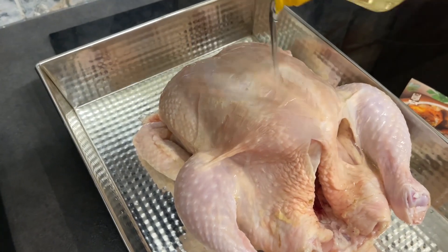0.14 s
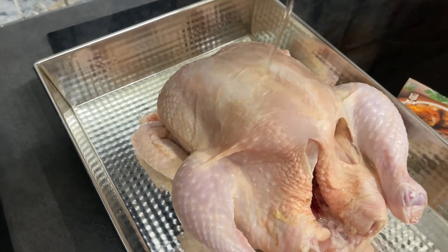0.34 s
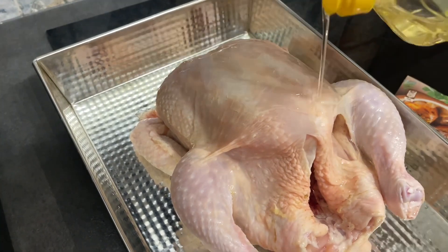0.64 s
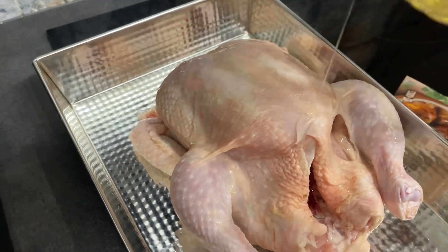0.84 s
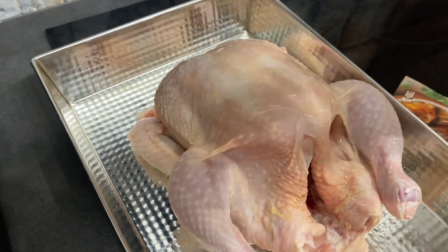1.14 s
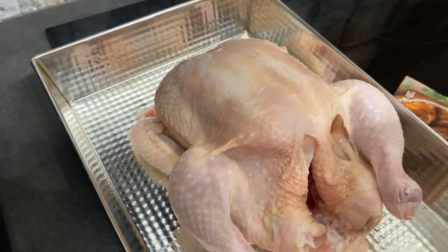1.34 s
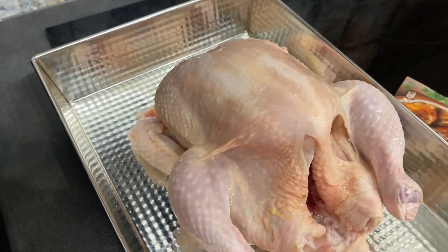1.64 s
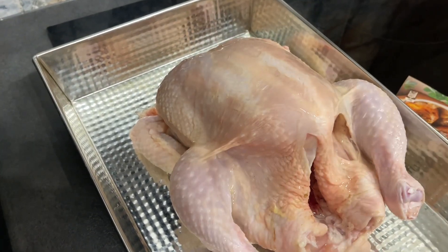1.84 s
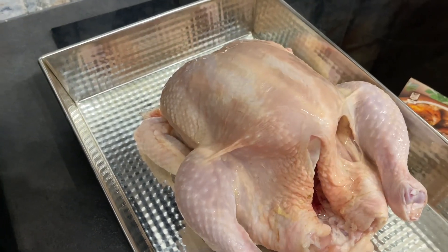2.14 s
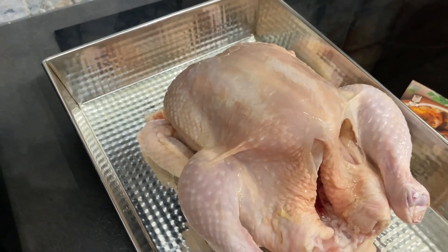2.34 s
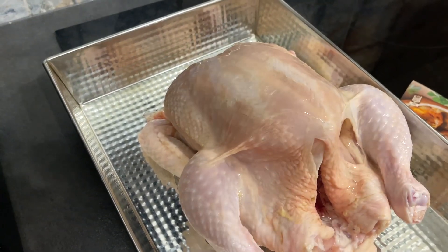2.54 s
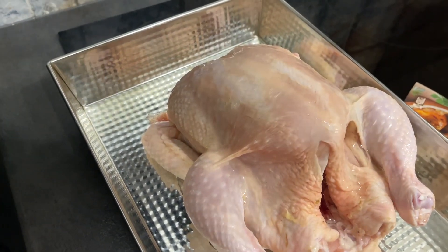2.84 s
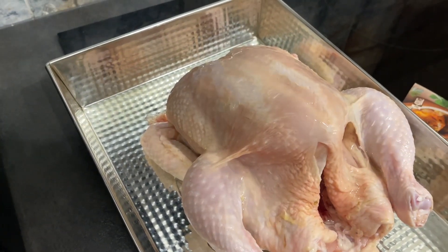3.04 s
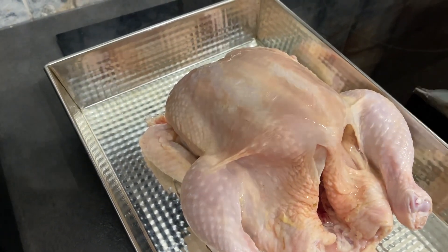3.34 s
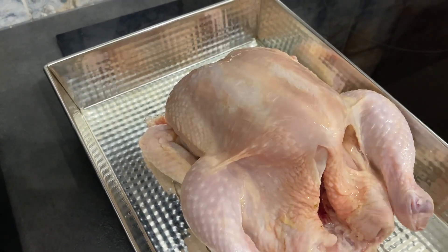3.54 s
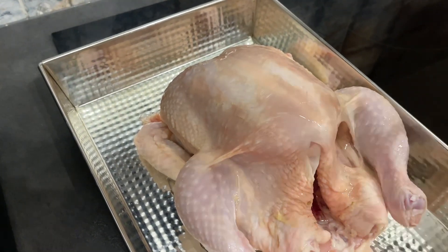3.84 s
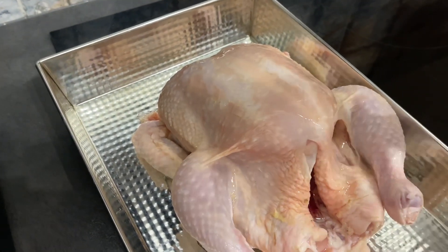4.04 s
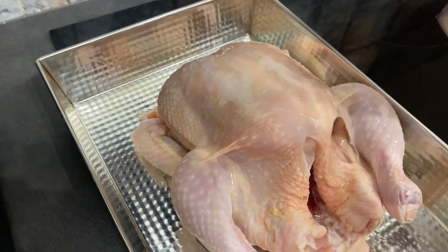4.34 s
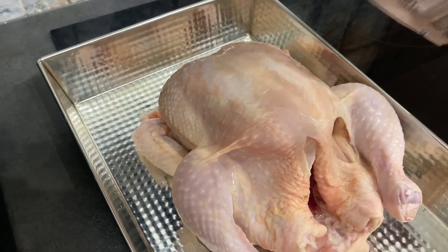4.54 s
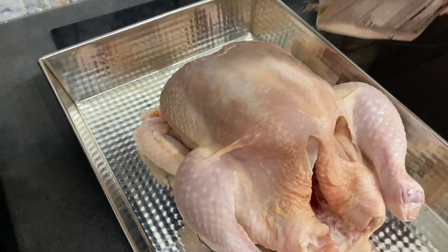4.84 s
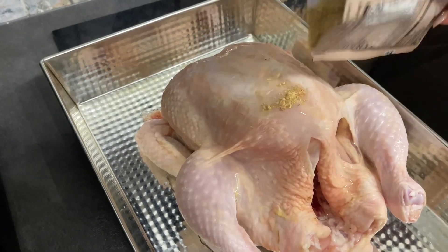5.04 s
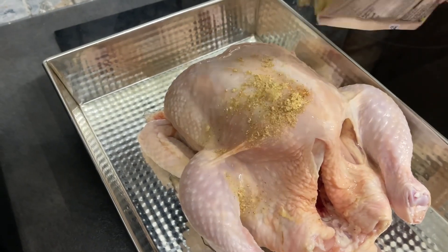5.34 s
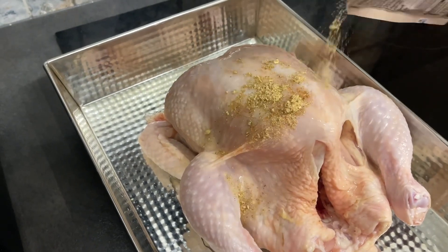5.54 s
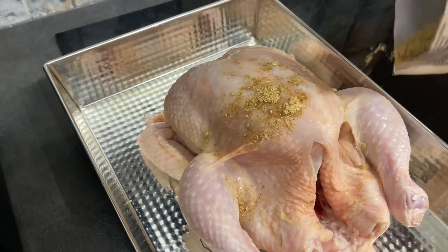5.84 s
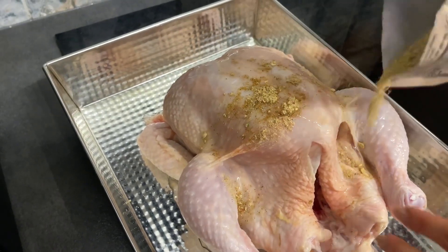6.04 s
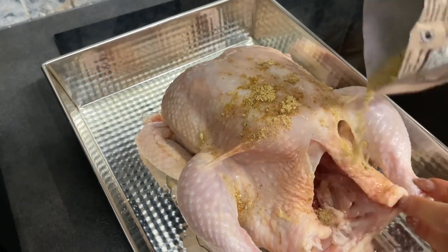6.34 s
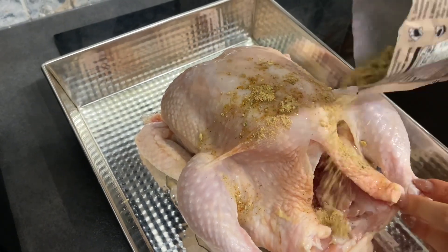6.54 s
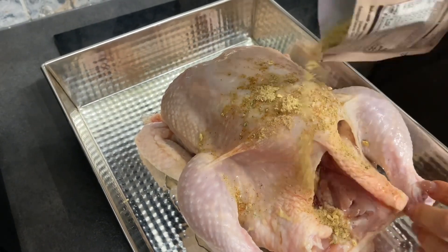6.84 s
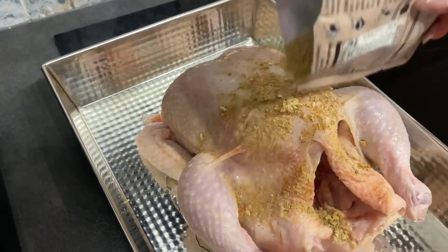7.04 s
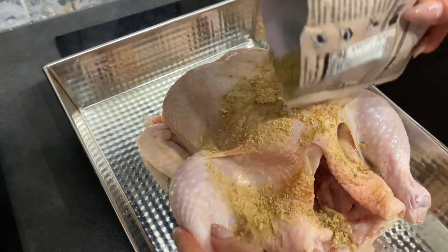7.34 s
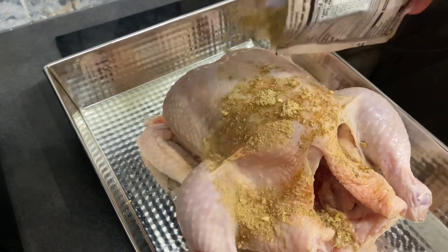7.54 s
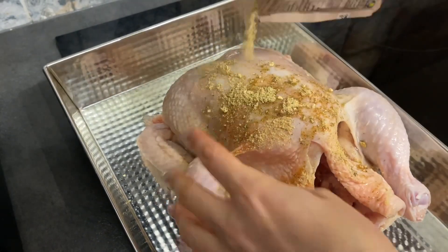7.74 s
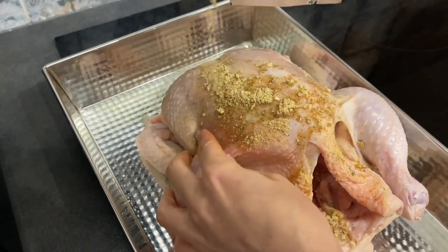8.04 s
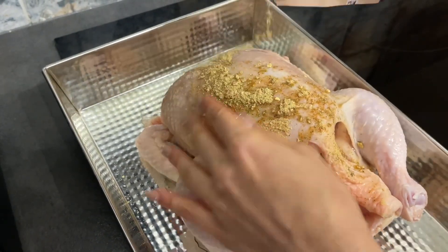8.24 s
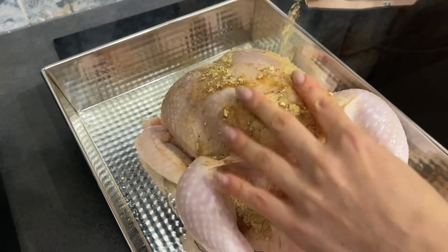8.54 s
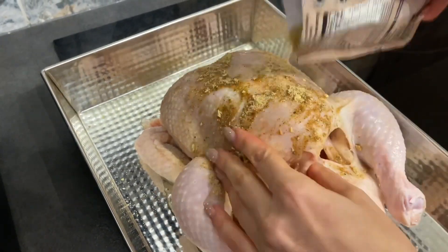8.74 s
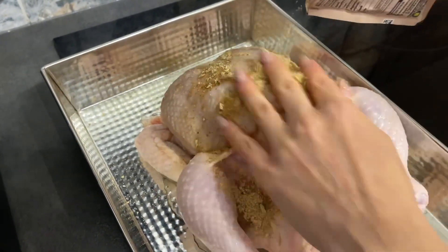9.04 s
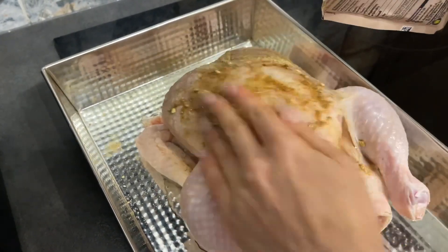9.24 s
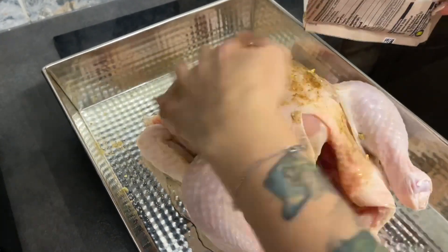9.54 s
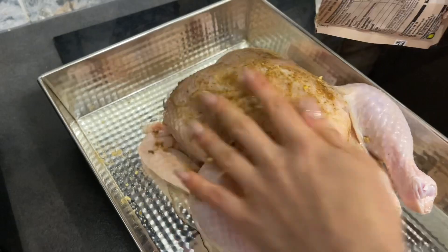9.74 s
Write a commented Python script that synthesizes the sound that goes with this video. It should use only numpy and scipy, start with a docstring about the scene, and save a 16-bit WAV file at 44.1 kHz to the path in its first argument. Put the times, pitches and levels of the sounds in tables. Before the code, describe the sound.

A phone close to a kitchen counter picks up scattered taps, low thumps and a short heavy scrape, then the loud dry tearing of a paper seasoning packet. Softer rustles and sharp creases follow as it is shaken out in short bursts, with a single bright clack among them. It ends in swishing, grainy rubbing of powder over oiled skin, with a short room tail and faint low rumble.

```python
"""First come light touches, knocks and pushes, as things are put down and moved on a kitchen counter; then a
paper seasoning packet is pulled open and shaken out over a chicken in a metal tray, and a hand rubs the powder in.
Creases are noise bursts ringing paper resonances; crackle and powder are noise gated by random grains.
Knocks are noise bursts ringing modes, bumps are falling sines, and drags are stick-slip noise in resonators.
A small room answers with a short tail over a low rumble, and a phone takes it in at two ports."""
import sys
import numpy as np
from scipy import signal
from scipy.fft import rfft, irfft, next_fast_len
from scipy.io import wavfile
from scipy.ndimage import uniform_filter1d

SR = 44100
rng = np.random.default_rng(int(sys.argv[2]) if len(sys.argv) > 2 else 0)


def unload_wav(signal):
    """Save mono or channel-first audio to the path in sys.argv[1] as 16-bit WAV at rate SR, clipped to [-1, 1]."""
    wavfile.write(
        sys.argv[1],
        SR,
        np.round(np.clip(np.atleast_2d(signal).T, -1, 1) * 32767).astype(np.int16),
    )


N = 436590
TIME = np.arange(N) / SR
HIT_TIME = np.arange(-SR // 50, SR // 3) / SR  # a hit's own clock: its peak is at 0

# the top of the packet is torn off in two pulls: (time [s], level [dB])
TEAR = [(3.76, -60), (3.779, -33), (3.94, -35.5), (4.1, -44), (4.16, -38.5), (4.285, -33), (4.34, -48)]
# shakes that tip the powder out: (start [s], length [s], level [dB])
SHAKES = [(5.453, 0.053, -52.5), (5.59, 0.038, -52), (5.838, 0.054, -55.5), (5.979, 0.09, -50.5),
          (6.273, 0.066, -44.5), (6.409, 0.081, -43.5), (6.571, 0.025, -44.5), (6.689, 0.087, -49),
          (6.864, 0.01, -48), (7.009, 0.068, -56.5), (7.175, 0.071, -38), (7.317, 0.071, -42),
          (7.461, 0.17, -49), (8.296, 0.21, -46.5), (8.562, 0.064, -43), (8.65, 0.13, -51.5),
          (8.847, 0.087, -43)]
# spectrum of fine paper crackle: (frequency [Hz], level [dB])
CRACKLE = [(1500, -19), (3000, -11.5), (6500, -9), (8500, -1.5), (11300, 2), (12400, -14.5), (13800, -55)]
# spectrum of the duller sound of the paper sheet: (frequency [Hz], level [dB])
PANEL = [(100, -1.5), (250, 4), (480, -5.5), (900, 1), (1900, 2.5), (2800, -0.5), (14000, -38.5)]
# spectrum of dull blows and judder: (frequency [Hz], level [dB])
THUD = [(60, -13), (130, 2), (430, -13.5), (750, -17), (2500, -31.5), (14000, -75)]


def undb(db):
    """Amplitude ratio of a level: 20 dB is a factor of ten."""
    return 10 ** (np.asarray(db) / 20)


def unit(x):
    """Normalisation to an rms amplitude of 1."""
    return x / np.sqrt(np.mean(x ** 2))


def noise(size):
    """Partial coherence: noise at two microphones is partly shared and partly of opposite sign."""
    mid, side = rng.standard_normal((2, size))
    return mid + .62 * np.array([side, -side])


def colour(x, points):
    """Minimum-phase filtering: the folded cepstrum of a (Hz, dB) log gain gives a causal response."""
    size = 2048
    hz, db = np.transpose(points)
    grid = np.maximum(np.fft.rfftfreq(size, 1 / SR), 1)
    log_gain = np.log(undb(np.interp(np.log(grid), np.log(hz), db)))
    cepstrum = irfft(log_gain)
    cepstrum[1:size // 2] *= 2
    cepstrum[size // 2 + 1:] = 0
    response = irfft(np.exp(rfft(cepstrum)))
    return signal.oaconvolve(x, response[None], axes=1)[:, :x.shape[1]]


def resonate(x, hz, q):
    """Simple resonance: gain 1 at its centre, falling away on both sides."""
    centre = np.clip(hz, 30, SR / 3)
    return signal.lfilter(*signal.iirpeak(centre, max(q, .5), fs=SR), x)


def ring(x, hz, t60):
    """Modal decay: the Q follows from the time t60 [s] in which the mode falls by 60 dB."""
    return resonate(x, hz, np.pi * hz * t60 / np.log(1000))


def fade(t60, rise=0.019):
    """Exponential growth and decay of a hit: up by 60 dB in rise [s], down by 60 dB in t60 [s]."""
    growth, decay = -HIT_TIME / max(rise, 1e-4), HIT_TIME / max(t60, 1e-3)
    return np.exp(-np.log(1000) * np.maximum(decay, growth))


def burst(t60, rise, tail_db, tail_t60):
    """Impact as uneven micro-clicks: fast decay, weaker aftermath, and a ragged colour for each spot struck."""
    size = len(HIT_TIME)
    clicks = noise(size) * undb(2.5 * rng.standard_normal(size))
    spot = .11 * rng.standard_normal(160) * np.exp(-np.arange(160) / 60)
    spot[0] = 1
    clicks = signal.oaconvolve(clicks, spot[None], axes=1)[:, :size]
    return clicks * (fade(t60, rise) + undb(tail_db) * fade(tail_t60, 2 * rise))


def strength(x, db):
    """Short-time level: scale a hit so that its loudest 5 ms have this rms level."""
    power = uniform_filter1d(x.mean(axis=0) ** 2, SR // 200)
    return x * undb(db) / np.sqrt(power.max())


def place(hit, s):
    """Directional hearing by arrival time and level; the time difference vanishes at high frequencies."""
    # where the hands work, from each time on: (time [s], left delay [ms], left minus right [dB])
    hand_places = [(0, -0.047, -0.9), (2.7, -0.049, 1), (3.7, 0.18, 0), (4.5, -0.033, -2)]
    _, lag_ms, pan_db = [row for row in hand_places if row[0] <= max(s, hand_places[0][0])][-1]
    size = next_fast_len(hit.shape[1])
    hz = np.fft.rfftfreq(size, 1 / SR)
    turn = np.pi * hz * lag_ms / 1000 / (1 + (hz / 7500) ** 12)  # half the delay goes to each side
    sides = np.array([[1], [-1]])
    return irfft(rfft(hit, size) * np.exp(-1j * sides * turn), size) * undb(sides * pan_db / 2)


def add(track, s, hit):
    """Superposition: add a hit to a stereo track, with its peak near s seconds."""
    start = max(int((s + HIT_TIME[0]) * SR), 0)
    track[:, start:start + hit.shape[1]] += hit[:, :N - start]


def walk(rate):
    """Slow random fluctuation of rms 1: random levels, rate per second, joined by straight lines."""
    return unit(np.interp(TIME * rate, np.arange(400), rng.standard_normal(400)))


def grains(rate, spread_db, t60):
    """Random point process: tiny slips of uneven size, each a puff of energy; returns an envelope of rms 1."""
    chance, size = rng.random(N), np.minimum(rng.exponential(size=N), 4)
    slips = (chance < rate / SR) * undb(spread_db * size) ** 2
    power = signal.fftconvolve(slips, fade(t60, rise=.005) ** 2)[:N]
    return np.sqrt(np.maximum(power, 0) / power.mean())


def move(start, length, attack_s=0.012, release_s=0.015):
    """Exponential build-up and release of one move of the hand, with a hold between (time constants)."""
    before = np.maximum(start - TIME, 0)
    after = np.maximum(TIME - start - length, 0)
    return np.exp(-before / attack_s - after / release_s) + 1e-9


def follow(curve, axis=1):
    """Level interpolation: gain along one dB column of a curve, silent before and after it."""
    columns = np.transpose(curve)
    return undb(np.interp(TIME, columns[0], columns[axis], left=-180, right=-180))


def flexing(taut_panel_db=1.5, slack_panel_db=-9):
    """Tension and radiation: taut paper carries more dull sound than slack; gains of crackle and panel."""
    # the mouth of the packet is spread open: (time [s], level [dB])
    spread_open = [(4.385, -36), (4.55, -43), (4.648, -29.5), (4.764, -43), (4.94, -42), (5.0, -52)]
    # held over the tray, the packet is never quite still: (time [s], level [dB])
    held_packet = [(5.0, -51.5), (5.75, -68), (6.5, -55), (7.5, -48), (8.1, -56.5), (8.9, -56.5)]
    taut = follow(TEAR)
    shaken = sum(undb(db) * move(s, length) for s, length, db in SHAKES)
    slack = follow(spread_open) + follow(held_packet) + shaken
    return taut + slack, taut * undb(taut_panel_db) + slack * undb(slack_panel_db)


def snaps(crack_db=-1, panel_db=-1, ring_db=6, panel_q=7, facet_db=6, facet_t60=0.023, count=4):
    """Buckling: a crease flips with a crack and rings the paper beside it and a few small stiff facets."""
    # the louder creases, before the overall trims: (time [s], crack [dB], panel [dB], panel pitch [Hz])
    creases = [(1.945, -32.5, -64, 1590), (3.1889, -43, -30.5, 2400), (3.226, -30.5, -40, 2370),
               (3.2484, -56, -30.5, 1020), (3.3466, -41, -29.5, 1140), (3.7787, -16.5, -21, 1230),
               (3.8236, -10, -11.5, 1180), (3.865, -9, -24.5, 1340), (3.9209, -18, -20.5, 1850),
               (3.927, -5.5, -17.5, 1440), (3.9374, -15, -18.5, 1864), (4.052, -25.5, -32, 2000),
               (4.139, -14.5, -23, 1960), (4.1537, -24, -16.5, 1900), (4.185, -11.5, -21, 1030),
               (4.2336, -15, -25, 1080), (4.24, -9.5, -17, 1530), (4.353, -27.5, -52, 1080),
               (4.367, -24.5, -46, 1500), (4.4409, -32, -28.5, 1800), (4.595, -31, -29, 1294),
               (4.669, -23, -43, 2400), (5.0424, -39, -25.5, 1780), (5.0651, -31, -19.5, 2300),
               (5.088, -15, -23.5, 2340), (5.138, -30.5, -26, 2150), (5.36, -33.5, -43.5, 2240),
               (5.5, -30.5, -46, 1880), (5.6367, -36, -43, 2500), (5.7416, -37.5, -46, 1620),
               (6.053, -29, -46, 2350), (6.256, -34, -37.5, 1070), (6.276, -30, -41, 1300),
               (6.308, -41, -43, 2050), (6.4247, -23.5, -30, 1380), (6.5621, -40, -34.5, 1450),
               (6.701, -32, -40.5, 1162), (6.774, -27.5, -45, 2330), (6.911, -31.5, -50, 2110),
               (7.33, -28.5, -35.5, 1703), (7.45, -19, -34.5, 2320), (7.583, -26.5, -45, 1880),
               (7.8508, -33, -43, 2260), (8.226, -29.5, -45, 960), (8.355, -18, -41, 2130),
               (8.4195, -36, -31, 1770), (8.452, -29.5, -42, 2100), (8.58, -52, -36, 1710),
               (8.841, -24.5, -36.5, 1230), (9.1478, -20, -39, 2320)]
    # spectrum of the crack: (frequency [Hz], level [dB])
    crack_colour = [(1500, -29), (4000, -1.5), (6500, -1), (11000, 13.5), (12500, -5.5), (14000, -42)]
    out = np.zeros((2, N))
    for s, high, low, hz in creases:
        crack = colour(burst(t60=.018, rise=.0015, tail_db=-18, tail_t60=.08), crack_colour)
        facets = sum(ring(crack, f, facet_t60) for f in 2800 * 3.3 ** rng.random(count))
        crack = crack + undb(facet_db) * facets
        panel = colour(burst(t60=.026, rise=.005, tail_db=-17, tail_t60=.1), PANEL)
        panel = panel + undb(ring_db) * resonate(panel, hz, panel_q)
        hit = strength(crack, high + crack_db) + strength(panel, low + panel_db)
        add(out, s, place(hit, s))
    return out


def crinkles(flex, count=290, crack_db=-2, panel_db=-1, spread_db=7):
    """Scattered buckling: small creases give way as the paper flexes, each with its own pitches."""
    out, size = np.zeros((2, N)), len(HIT_TIME) // 8
    high, low = 20 * np.log10(flex)
    first, last = TEAR[0][0], SHAKES[-1][0]
    fine, dull = colour(noise(N), CRACKLE), colour(noise(N), PANEL)
    envelope = fade(t60=.021, rise=.001)[:size]
    for when, pitch, tone, force, weight in rng.random((count, 5)):
        t = first + when * (last - first)
        i = int(t * SR)
        crack = resonate(fine[:, i:i + size] * envelope, 4000 * 2.7 ** pitch, 1.5)
        panel = resonate(dull[:, i:i + size] * envelope, 850 * 3 ** tone, 5)
        crack = strength(crack, high[i] + crack_db + spread_db * force)
        panel = strength(panel, low[i] + panel_db + spread_db * (force + weight) / 2)
        add(out, t, crack + panel)
    return out


def touching():
    """Light contact excitation: gains of crackle and panel as the packet is touched, lifted or tipped."""
    # touches of the packet: (start [s], length [s], crackle [dB], panel [dB])
    touches = [(0.967, 0.075, -57, -52.5), (1.18, 0.17, -62.5, -49.5), (1.506, 0.56, -65, -53),
               (2.132, 0.14, -57.5, -53), (2.747, 0.25, -62, -46.5), (3.14, 0.14, -53, -44),
               (3.337, 0.073, -52.5, -40), (5.033, 0.078, -42, -41.5)]
    return sum(undb([[high], [low]]) * move(s, length) for s, length, high, low in touches)


def friction(gains, grain, treble, treble_db, panel_db):
    """Two radiation paths: grains sound as fine crackle, and duller through the sheet that carries them."""
    high, low = gains
    fine = unit(colour(grain * noise(N), treble)) * high * undb(treble_db)
    dull = unit(colour(grain * noise(N), PANEL)) * low * undb(panel_db)
    return fine + dull


def bending(x, count=8, sway_db=5):
    """Shifting resonance: as the sheet bends and the hand moves, bands swell and fade independently."""
    out = x.copy()
    for hz in np.geomspace(750, 8500, count):
        swell = undb(sway_db * walk(rate=12))
        out += resonate(x, hz, 5) * (unit(swell) - 1)
    return out


def rustle(flex):
    """Granular friction: sparse crackle of flexed paper, and the denser fine hiss of rubbed powder."""
    # powder sliding under the hand, before the trims below: (time [s], hiss [dB], skin [dB])
    rubbing = [(8.92, -47.5, -60), (9.16, -36, -81), (9.21, -43, -57), (9.28, -37, -52), (9.4, -42.5, -51),
               (9.55, -35.5, -50.5), (9.65, -43.5, -45.5), (9.78, -36, -47), (9.9, -44.5, -54.5)]
    # spectrum of the powder hiss: (frequency [Hz], level [dB])
    powder_colour = [(2500, -10.5), (6000, -1), (8500, 6.5), (11200, 12.5), (12400, 2), (13900, -15)]
    crackle = grains(rate=1100, spread_db=4, t60=.028)
    grit = grains(rate=2000, spread_db=3, t60=.012)
    paper = friction(touching() + flex, crackle, CRACKLE, treble_db=7, panel_db=0.5)
    rub_gains = follow(rubbing), follow(rubbing, axis=2)
    powder = friction(rub_gains, grit, powder_colour, treble_db=6.0, panel_db=3.0)
    return bending(paper + powder)


def strokes(sag_octaves_per_s=1.4):
    """Stick-slip of fingers in tiny steps: soft brushing or a low squelch whose pitch sags as the stroke slows."""
    # fingers slide over things and oiled skin: (start [s], length [s], level [dB], pitch [Hz], sharpness [Q])
    finger_slides = [(0.244, 0.046, -44, 1380, 0.76), (7.624, 0.29, -51, 2000, 1.7),
                     (9.364, 0.21, -50, 2860, 3.6), (9.45, 0.0065, -43, 620, 4.4),
                     (9.667, 0.027, -42.5, 1280, 2)]
    slips = grains(rate=900, spread_db=2.5, t60=.025) * noise(N)
    out = np.zeros((2, N))
    for s, length, db, hz, q in finger_slides:
        pitch = hz * 2 ** (-sag_octaves_per_s * np.clip(TIME - s, 0, length))
        turn = np.exp(2j * np.pi * np.cumsum(pitch) / SR)
        # shift the pitch to zero, low-pass, and shift back: a band-pass that glides
        band = signal.lfilter(*signal.butter(2, hz / q / 2, fs=SR), slips / turn) * turn
        out += unit(band.real) * undb(db) * move(s, length)
    return out


def tray(x, tray_db=-6):
    """Sympathetic resonance: the metal tray rings faintly along with the sounds passed to it."""
    # modes of the tray: (frequency [Hz])
    tray_modes = [963, 1428, 1851, 2390, 3875, 5134, 7591, 8150]
    return x + undb(tray_db) * sum(ring(x, hz, t60=.06) for hz in tray_modes)


def knocks(body_db=2, tick_db=-1, ring_db=13, body_q=11, modes_db=11, uneven_db=0.5):
    """Modal excitation by a hard contact: a bright tick and the ring of the thing touched, uneven by spot."""
    # contacts with counter and tray, before the trims: (time [s], body [dB], pitch [Hz], tick [dB])
    contacts = [(0.101, -57, 940, -44.5), (0.961, -39, 774, -64), (1.157, -24.5, 836, -36.5),
                (1.266, -40.5, 990, -31), (1.346, -28.5, 1100, -27), (1.374, -24.5, 2290, -34),
                (1.776, -44.5, 1980, -36), (1.884, -30.5, 1150, -31), (2.128, -24.5, 970, -33.5),
                (2.16, -28.5, 1020, -45), (2.524, -33, 1500, -37.5), (2.812, -25.5, 1170, -44),
                (2.96, -41, 970, -29.5), (3.165, -41, 930, -33.5), (3.375, -30, 960, -24.5),
                (3.648, -35, 2310, -41), (7.161, -16.5, 890, -6.5)]
    # what the hard contacts ring with: (frequency [Hz], level before the overall modes_db [dB])
    hard_modes = [(485, -6), (650, -12), (1000, -7), (1780, -7), (3880, 2)]
    # spectra of the body and of the tick: (frequency [Hz], level [dB])
    body_colour = [(110, 7.5), (1000, 9.5), (2000, 6.5), (3000, -3.5), (13000, -31)]
    tick_colour = [(1800, 0), (3800, 6), (6000, 3), (11000, 4.5), (13500, -29)]
    out = np.zeros((2, N))
    for s, low, hz, high in contacts:
        blow = colour(burst(t60=.04, rise=.005, tail_db=-15.5, tail_t60=.2), body_colour)
        modes = sum(ring(blow, f, t60=.08) * undb(db + uneven_db * rng.standard_normal())
                    for f, db in hard_modes)
        pitched = resonate(blow, hz, body_q) * fade(t60=.09)
        body = blow + undb(modes_db) * modes + undb(ring_db) * pitched
        tick = colour(burst(t60=.028, rise=.003, tail_db=-17, tail_t60=.19), tick_colour)
        hit = strength(body, low + body_db) + strength(tick, high + tick_db)
        add(out, s, place(hit, s))
    return out


def bumps(boom_db=-2, thud_db=-2, chirp=3.3, chirp_s=0.00448):
    """Dispersion: higher bending waves arrive first, so the pitch of a dull blow drops quickly to a low boom."""
    # dull bumps and lumps of powder that plop onto the bird, before the trims:
    # (time [s], boom [dB], final pitch [Hz], boom t60 [s], thud [dB])
    dull_blows = [(0.662, -35, 102.4, 0.41, -57), (1.16, -43, 111, 0.35, -32.5),
                  (1.268, -29, 98.3, 0.16, -21.5), (1.343, -28, 120, 0.23, -27),
                  (1.372, -32, 124.6, 0.14, -28.5), (2.129, -21.5, 65.4, 0.22, -24),
                  (2.751, -16, 112.6, 0.15, -22), (2.813, -23.5, 104.2, 0.46, -19.5),
                  (4.153, -28, 132, .12, -22.5), (5.173, -29, 72, 0.2, -45),
                  (5.228, -34.5, 155, 0.088, -53), (7.161, -35, 80.1, 1, -23),
                  (9.6, -34.5, 68.4, 0.86, -68)]
    out = np.zeros((2, N))
    t = np.maximum(HIT_TIME, 0)
    onset = 1 - np.exp(-t / chirp_s)
    for s, low, hz, t60, mid in dull_blows:
        cycles = hz * (t + chirp * chirp_s * onset)
        boom = np.tile(np.sin(2 * np.pi * cycles) * fade(t60) * onset, (2, 1))
        thud = colour(burst(t60=.06, rise=.006, tail_db=-11, tail_t60=.3), THUD)
        hit = strength(boom, low + boom_db) + strength(thud, mid + thud_db)
        add(out, s, place(hit, s))
    return out


def drags(hollow_q=5):
    """Stick-slip: something heavy judders over the counter and rings its hollow resonances."""
    # pushes along the counter: (start [s], length [s], level [dB])
    pushes = [(1.25, 0.173, -42), (2.762, 0.11, -27), (2.908, 0.094, -37)]
    # hollow resonances of the counter: (frequency [Hz])
    counter_modes = [278, 410, 556]
    judder = colour(grains(rate=250, spread_db=3, t60=.03) * noise(N), THUD)
    hollow = unit(sum(resonate(judder, hz, hollow_q) for hz in counter_modes))
    return hollow * sum(undb(db) * move(s, length) for s, length, db in pushes)


def kitchen(x, room_db=-19, room_t60=0.45, mode_hz=100, mode_q=16, mode_db=-1):
    """Reverberation: walls return a short, duller tail, and one low room mode hangs on after each bump."""
    t = TIME[:SR // 2]
    tail = rng.standard_normal((2, SR // 2)) * np.exp(-np.log(1000) * t / room_t60)
    tail = colour(tail * (t > .006), [(2500, -14.0), (10000, -23.5)])  # only the slope matters
    walls = signal.oaconvolve(x, tail / np.linalg.norm(tail[0]), axes=1)[:, :N]
    return x + undb(room_db) * walls + undb(mode_db) * resonate(x, mode_hz, mode_q)


def room_tone(steady_db=-50.5, rumble_db=-49, waver_db=2):
    """Broadband background noise: steady air, and a low resonant rumble that swells and sinks."""
    # spectrum of the steady air: (frequency [Hz], level [dB])
    air_colour = [(20, -26), (58, 6.5), (105, -1), (160, -11), (260, -5.5), (420, -15), (1000, -13.5),
                  (4000, -30.5), (11500, -29.5), (13800, -99)]
    air = unit(colour(noise(N), air_colour)) * undb(steady_db)
    rumble = unit(resonate(resonate(noise(N), 65.8, 1), 103.0, 0.44))
    return air + rumble * undb(rumble_db + waver_db * walk(rate=8.5))


def scene():
    """Superposition of all the handling sounds in the kitchen, over the room tone."""
    flex = flexing()
    near_tray = tray(snaps() + crinkles(flex) + rustle(flex) + strokes())
    return kitchen(near_tray + knocks() + bumps() + drags()) + room_tone()


def record(dry, left_db=4.5, wide_hz=230, mono_hz=8000, turn_hz=10200, turn_q=5.3, top_hz=15900):
    """Mid-side stereo: the phone leans left, narrows in bass and treble, and turns the left port's phase once."""
    hz = np.fft.rfftfreq(N, 1 / SR)
    mid, side = (dry[0] + dry[1]) / 2, (dry[0] - dry[1]) / 2
    lean = (undb(left_db) - 1) / (undb(left_db) + 1)
    lean = lean * (hz + wide_hz / 2) / (hz + wide_hz)  # half as strong in the deep bass
    side_spectrum = rfft(side) * hz / np.hypot(hz, wide_hz) + lean * rfft(mid)
    side = irfft(side_spectrum / (1 + (hz / mono_hz) ** 10), N)
    left, right = mid + side, mid - side
    left = left - 2 * resonate(left, turn_hz, turn_q)  # all-pass
    ports = np.clip([left, right], -1, 1)
    return signal.sosfilt(signal.ellip(8, .2, 70, top_hz, fs=SR, output="sos"), ports)


dry = scene()
out = record(dry)
unload_wav(out)
```